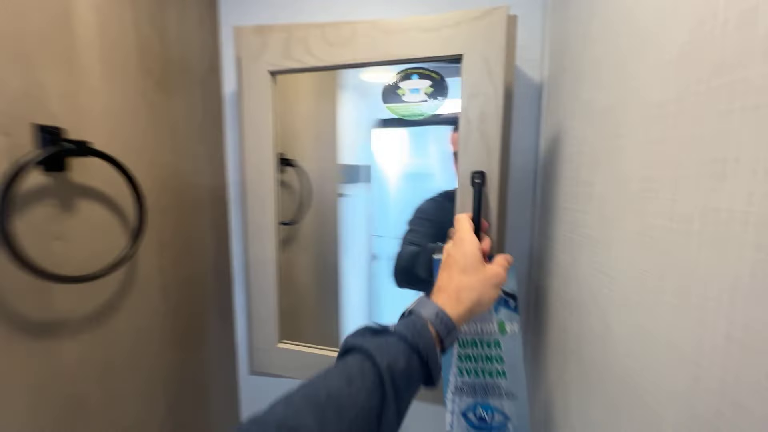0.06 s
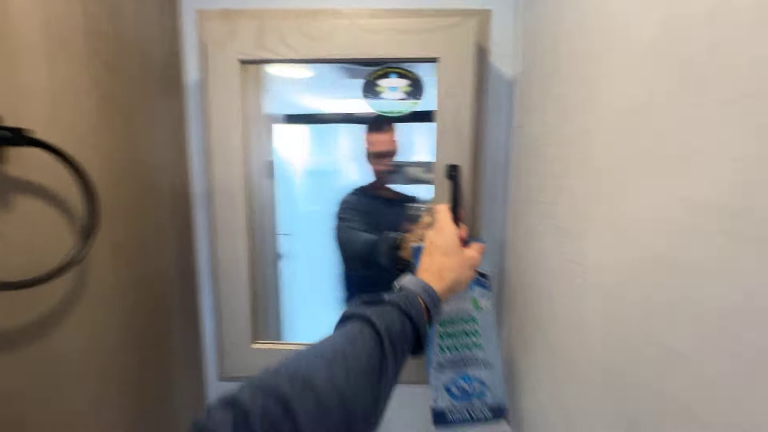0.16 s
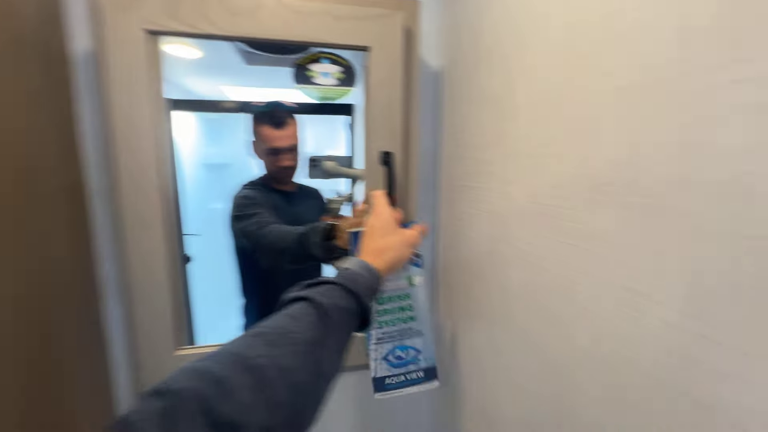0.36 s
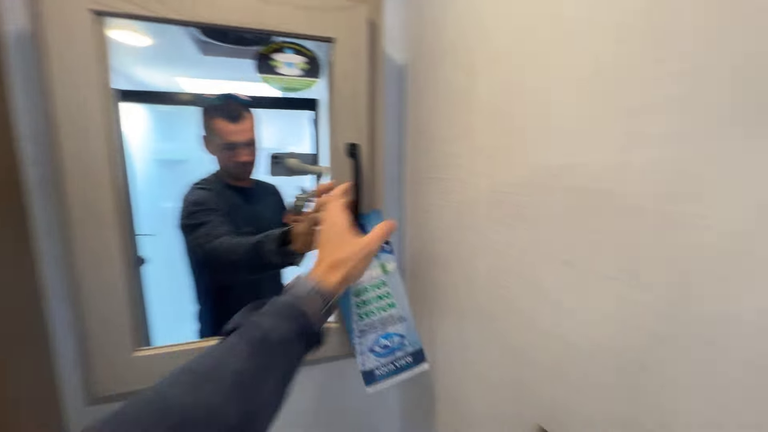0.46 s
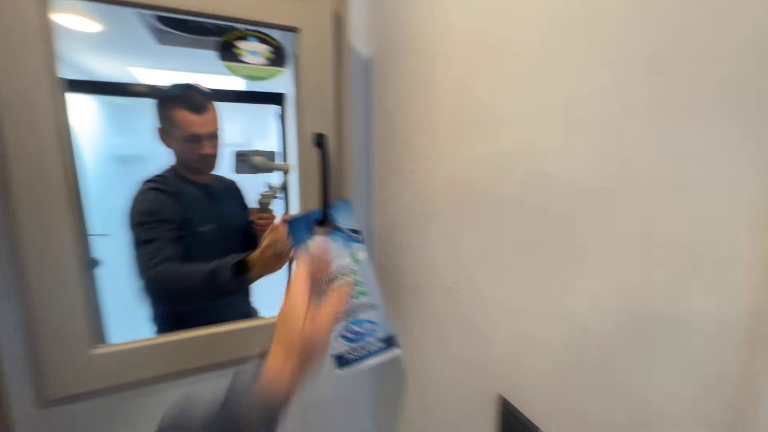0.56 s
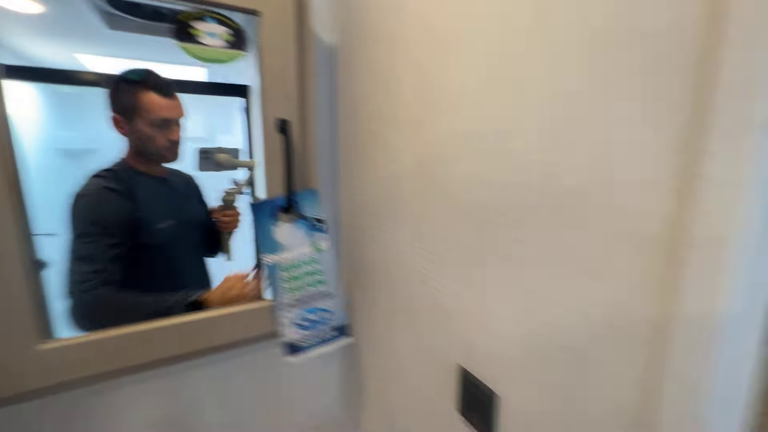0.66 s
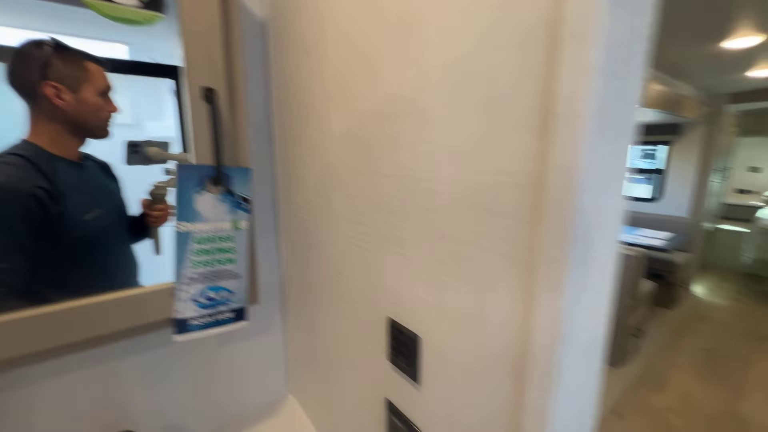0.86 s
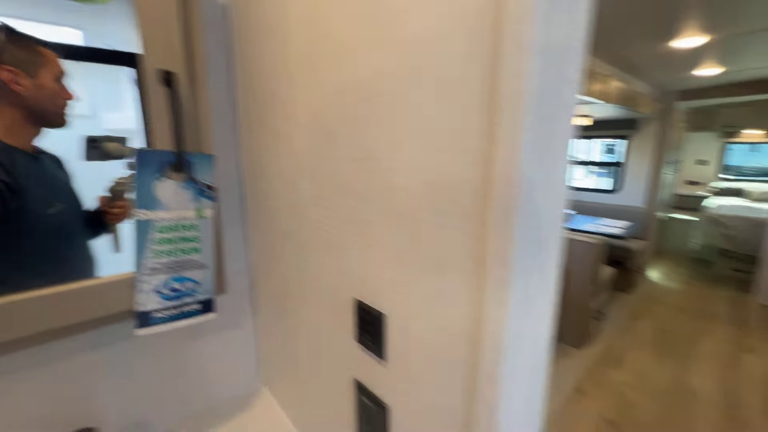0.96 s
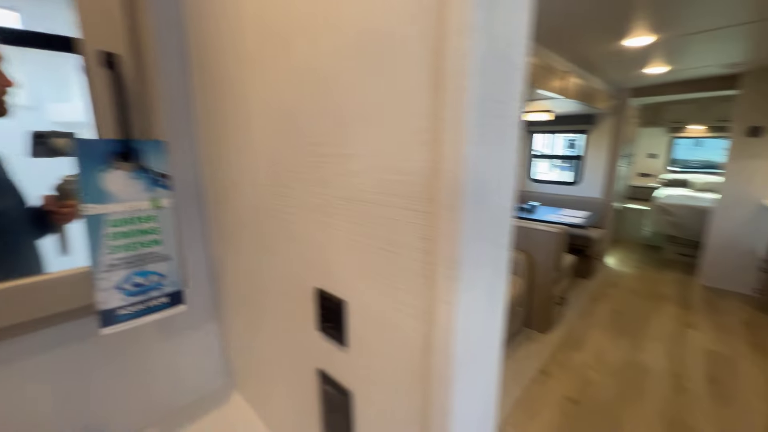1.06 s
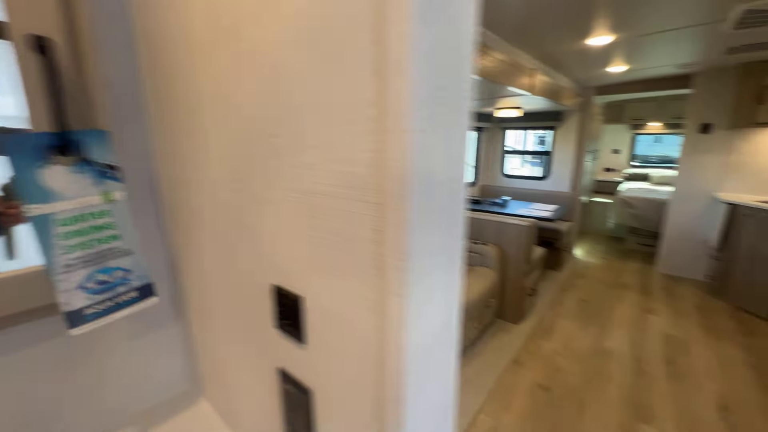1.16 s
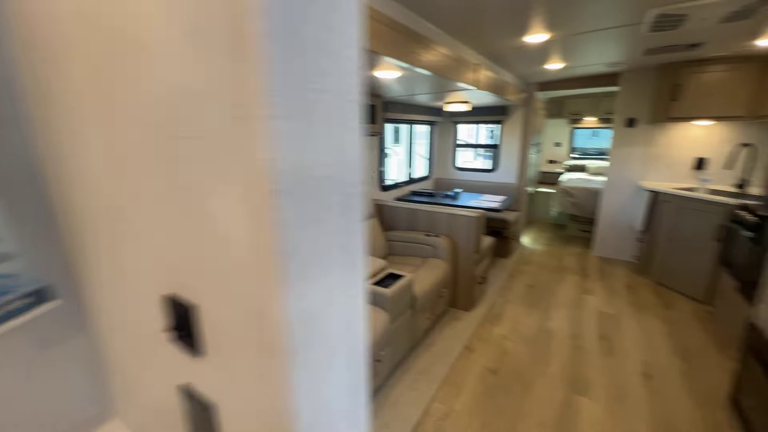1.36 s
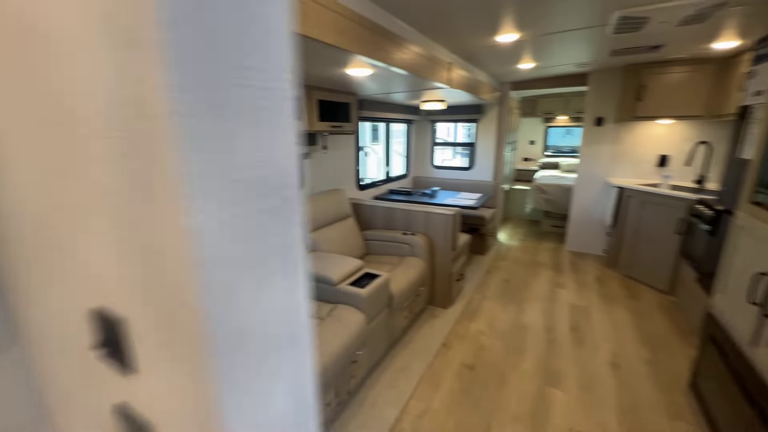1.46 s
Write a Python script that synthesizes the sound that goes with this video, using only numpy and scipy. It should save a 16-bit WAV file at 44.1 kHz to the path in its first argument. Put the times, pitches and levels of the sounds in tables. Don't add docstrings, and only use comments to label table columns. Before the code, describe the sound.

A light wooden cabinet door with a mirror slaps shut close to the microphone in a small trailer washroom; sharp crack and catch clack, brief glassy rattle, hollow wall boom, then soft card swishes and small taps.

```python
import sys
import numpy as np
from scipy import signal
from scipy.fft import rfft, irfft
from scipy.io import wavfile
from scipy.ndimage import uniform_filter1d

SR = 44100
rng = np.random.default_rng(int(sys.argv[2]) if len(sys.argv) > 2 else 0)


def wrap_up_sound(samples):
    columns = np.atleast_2d(samples).T
    tamed = np.clip(columns, -1, 1)
    steps = np.round(tamed * 32767).astype(np.int16)
    wavfile.write(sys.argv[1], SR, steps)


def gain_from_db(level_db):
    decades = np.asarray(level_db, float) / 20
    return 10 ** decades


N = 66150
T = np.arange(N) / SR
HZ = np.maximum(np.fft.rfftfreq(N, 1 / SR), 1)

# freq_hz, density_db_per_hz
HUM_COLOUR = [(70, -30.5), (120, -17.5), (200, -21.5), (520, -7.5), (840, -28), (2000, -39), (3900, -55),
              (16000, -58)]
# freq_hz, width_hz, level_db
HUM_RESONANCES = [(390, 29, -1.5), (562, 57, -1), (254, 50, -8), (1560, 300, -16), (2420, 250, -17)]
# time_s, level_db
RUMBLE_LEVEL = [(0, -39), (.1, -37.5), (.2, -42.5), (.5, -33.5), (.72, -50.5), (.9, -47.5), (1.099, -53.5),
                (1.5, -56.5)]
# centre_s, level_db, pitch_hz, half_length_s
BUMPS = [(0.029, -33, 179, 0.0046), (0.038, -25.5, 76, 0.01), (0.076, -32, 55.7, .018),
         (0.099, -32.5, 55.23, .01), (0.183, -32, 68.7, .012), (0.434, -26, 66, 0.027),
         (0.481, -20.5, 69, 0.017), (0.556, -26.5, 63, 0.027), (0.611, -33, 60, 0.016),
         (0.675, -27.5, 66, 0.027), (0.825, -35, 48.7, 0.012), (1.197, -46.5, 102, 0.017)]
# time_s, level_db
MOTION_LEVEL = [(0, -87), (.08, -77.5), (.116, -69), (.18, -85), (.3, -58), (.37, -62), (.44, -59),
                (.5, -63), (.568, -69), (.66, -63.5), (.72, -67), (0.801, -77.5), (.803, -53), (.86, -59.5),
                (.922, -68), (1.05, -76.5), (1.22, -99), (1.5, -105)]
# freq_hz, density_db_per_hz
SLEEVE_COLOUR = [(500, -32.5), (900, -19.5), (1700, -12), (2450, -3), (4500, -7.5), (7000, -7.5),
                 (12000, -11), (16000, -18.5)]
# start_s, level_db, pitch_hz, brightness_db, overtones_db
TAPS = [(.090, -60, 2800, -6, -8), (.098, -57, 2300, -10, -10), (.107, -58, 2900, -10, -10),
        (.121, -56, 2900, -10, -10), (.13, -60, 2500, -10, -10), (.490, -50, 3380, -12, -12),
        (.581, -48.5, 2206, -17.5, -3.5), (0.8026, -41, 2590, -1, -19.5), (0.8102, -40, 2430, 3.5, -13),
        (.8145, -45.5, 2424, 2, -15), (.826, -53, 2500, -6, -15), (.830, -35, 2398, -0.5, 2),
        (.834, -44, 2780, -5, -2), (.839, -41, 2610, -7, 0), (.844, -40, 2590, -15.5, -14.5),
        (.8545, -43, 2430, -12, 3), (.859, -45.5, 2460, -5.5, 0), (.865, -48, 2380, -7, -1),
        (.879, -51, 2360, -19, 1), (.89, -54, 2350, -15, -8), (1.298, -62, 2330, -20, -6),
        (1.305, -63, 2400, -22, -8), (1.424, -61, 2006, -5, -3), (0.944, -62.5, 3100, 1, -5)]
# pitch_ratio, level_db
TAP_MODES = [(.95, -1.5), (1.06, -3)]
# pitch_ratio, level_db
TAP_OVERTONES = [(0.521, -5), (1.46, -3.5), (1.88, -8)]
# freq_hz, density_db_per_hz
TAP_COLOUR = [(500, -20.5), (1500, -15), (2400, -8.5), (4000, -7), (6600, -9), (11000, -7), (16000, -16.5)]
# freq_hz, level_db
THIN_TONES = [(7740, -47), (5530, -55.5)]
# start_s, level_db, chatter_t60_s
CONTACTS = [
    (.2110, -10.5, .01),
    (.2124, -8.5, .012),
    (.2145, -9.5, .012),
    (.2168, -11, .012),
    (.2195, -18.5, .016),
    (.2240, -24.5, .03),
]
# freq_hz, density_db_per_hz
CRACK_COLOUR = [(300, -28.5), (1300, -19), (2360, -12.5), (3830, -16.5), (7200, -15), (10000, -13.5),
                (12500, -19), (16000, -26.5)]
# freq_hz, level_db, t60_s
CATCH_MODES = [(2414, -7, .04), (2365, -14.5, .05), (1402.6, -17, .035), (1633, -15, .035),
               (2122, -15.5, .03), (2593, -17, .03), (2983, -19, .025), (3352, -19, 0.036),
               (1056, -20, 0.025), (860, -21.5, .03), (640, -20, .04), (490, -18, .06)]
# freq_hz, level_db, t60_s
MIRROR_MODES = [(1405, -20, 0.2), (1486, -22, 0.18), (1605, -25.5, 0.25), (1782, -21, .16),
                (2180, -22, 0.16), (2190, -23, .24), (2288, -25.5, 0.25), (2357, -15, 0.17),
                (3328, -25, 0.2), (4460, -23, 0.03), (5098, -22, 0.027), (6730, -16.5, 0.06),
                (7220, -22, 0.04), (8100, -26, 0.03)]
# freq_hz, density_db_per_hz
TAIL_COLOUR = [(300, -7.5), (715, -24), (1630, -30), (2300, -29.5), (3620, -33), (6580, -29.5),
               (11500, -36), (16000, -52)]
# freq_hz, level_db, t60_s
WALL_OUT = [(42.3, -34, 1.5), (52.3, -10, .29), (68.1, -15.5, 1.1), (73.9, -6, .56), (85.6, -11, .4),
            (95, -16.5, .66), (116.4, -25, .57)]
# freq_hz, level_db, t60_s
WALL_IN = [(54.4, -20.5, .9), (62.6, -5, .56), (136.7, 6.5, .06), (162, -15.5, .21)]
# freq_hz, level_db, t60_s
PANEL_MODES = [(565, -26, 0.24), (637, -22, 0.2), (745, -29.5, 0.37), (813, -27.5, .22), (861, -15, 0.17),
               (931, -23, .26), (1075, -17, .22), (1200, -28, .2)]
# freq_hz, level_db, t60_s
FRAME_OUT = [(217.3, -12, .29), (286.8, -17, .24), (354.1, -15.5, .19),
             (385, -26, .26), (260, -23.5, .15), (325, -26.5, .15), (420, -28.5, 0.12)]
# freq_hz, level_db, t60_s
FRAME_IN = [(227.5, -25, .8), (448.6, -23, .22)]
# centre_s, level_db, half_length_s
SWISHES = [
    (.385, -56, .04),
    (.445, -53, .035),
    (.68, -70, .05),
]
# freq_hz, density_db_per_hz
SWISH_COLOUR = [(1500, -35), (3200, -12), (4500, -4), (6600, -2), (8500, -6), (12000, -11), (14500, -10),
                (16000, -20)]
# freq_hz, side_db
SIDE_SHARE = [(60, -19.5), (380, -12), (700, -3), (1300, -3), (2200, -17), (4500, -18.5), (6000, -41),
              (16000, -40.5)]
# freq_hz, phase_rad
PORT_PHASE = [(0, 0), (690, .3), (2000, 0), (2900, 0), (3700, .5), (5100, 0), (7200, 0), (8600, -1.4),
              (9150, -3.1), (10800, -3.18), (11300, -4.3), (13400, -6.28), (14100, -6.6), (15500, -8.2),
              (16200, -9.8)]
# freq_hz, level_db
PORT_BALANCE = [(60, 1.9), (330, 1.7), (520, -2.5), (1000, .4), (2400, 0)]


def on_log(table):
    rows = np.array(table, float)
    return np.interp(np.log(HZ), np.log(np.maximum(rows[:, 0], 1)), rows[:, 1])


def level_over_time(table):
    rows = np.array(table, float)
    return np.interp(T, rows[:, 0], rows[:, 1])


def unit(x):
    return x / np.sqrt(np.mean(x ** 2))


def noise(gain):
    mid, side = rfft(rng.standard_normal((2, N))) * gain
    pair = mid + np.array([[1], [-1]]) * side * gain_from_db(on_log(SIDE_SHARE))
    return unit(irfft(pair, N))


def fade(start_s, t60_s, rise_s=.0003):
    out, first = np.zeros(N), int(np.ceil(start_s * SR))
    age_s = T[first:first + int(2 * t60_s * SR)] - start_s
    rise = 1 - np.exp(-age_s / rise_s)
    out[first:first + len(age_s)] = rise * np.exp(-np.log(1000) * age_s / t60_s)
    return out


def ring(modes, start_s, push_s):
    out, first = np.zeros(N), int(start_s * SR)
    for hz, db, t60_s in modes:
        span = slice(first, first + int(2 * t60_s * SR))
        age_s = np.maximum(T[span] - start_s - push_s / 2, 0)
        out[span] += gain_from_db(db) * np.sin(2 * np.pi * hz * age_s) * fade(start_s, t60_s, push_s)[span]
    return out


def walk(rate_hz):
    k = int(SR / rate_hz)
    steps = np.repeat(rng.standard_normal(N // k + 1), k)
    smooth = uniform_filter1d(uniform_filter1d(steps, k), k)
    return unit(smooth[:N])


def band(hz, width_hz):
    return 1 / np.sqrt(1 + ((HZ - hz ** 2 / HZ) / width_hz) ** 2)


def bell(centre_s, half_s):
    return np.exp(-((T - centre_s) / half_s) ** 2)


def trailer_hum():
    steady = noise(gain_from_db(on_log(HUM_COLOUR)) * band(600, 4034) ** 0.12)
    boxy_gain = sum(gain_from_db(db) * band(hz, width_hz) for hz, width_hz, db in HUM_RESONANCES)
    throb = gain_from_db(2.4 * walk(45))
    return gain_from_db(-55) * (steady + gain_from_db(-2.5) * noise(boxy_gain ** 2) * throb)


def hand_rumble():
    return noise(band(60, 58) ** 2) * gain_from_db(level_over_time(RUMBLE_LEVEL))


def sleeve_rustle():
    grain_db = 1.5 * walk(160)
    return gain_from_db(level_over_time(MOTION_LEVEL) + grain_db) * noise(gain_from_db(on_log(SLEEVE_COLOUR)))


def bumps():
    return -sum(gain_from_db(db) * np.cos(2 * np.pi * hz * (T - s)) * bell(s, half_s)
                for s, db, hz, half_s in BUMPS)


def card_taps():
    edge_t60_s, wash_t60_s, wash_db = 0.0093, .08, -14.5
    hiss, wash = noise(gain_from_db(on_log(TAP_COLOUR))), noise(gain_from_db(on_log(TAP_COLOUR)))
    out = 0
    for s, db, hz, bright_db, overtones_db in TAPS:
        ratios = TAP_MODES + [(ratio, g + overtones_db) for ratio, g in TAP_OVERTONES]
        modes = [(hz * ratio, g, edge_t60_s * 1.62) for ratio, g in ratios]
        edge = hiss * fade(s, edge_t60_s) + gain_from_db(wash_db) * wash * fade(s, wash_t60_s)
        out = out + gain_from_db(db) * (ring(modes, s, 0.00033) + gain_from_db(bright_db) * edge)
    return out


def thin_tones():
    start_s, rise_s = .191, .008
    swell = np.clip((T - start_s) / rise_s, 0, 1) * (T < CONTACTS[0][0])
    return swell * sum(gain_from_db(db + 2.5 * walk(200)) * np.sin(2 * np.pi * hz * T) for hz, db in THIN_TONES)


def contact_crack():
    colour = gain_from_db(on_log(CRACK_COLOUR))
    crack = noise(colour) * sum(gain_from_db(db) * fade(s, t60_s) for s, db, t60_s in CONTACTS)
    side = noise(colour)[0] * np.array([[1], [-1]])
    return crack + gain_from_db(-17) * side * fade(CONTACTS[0][0], 0.016, 0.00057)


def mirror_and_catch():
    mirror_s = .2135
    mirror = gain_from_db(-8.5) * ring(MIRROR_MODES, mirror_s, .0006)
    catch_first = gain_from_db(-6) * ring(CATCH_MODES[2:], .2117, .0006)
    catch = ring(CATCH_MODES, .2145, .0012) + catch_first
    rattle = gain_from_db(1.2 * walk(120))
    shimmer_gain = band(2380, 200) ** 2 + gain_from_db(-4.5) * band(6600, 500) ** 2
    shimmer = gain_from_db(-34) * noise(shimmer_gain) * fade(mirror_s, .35, .004)
    return (mirror + catch) * rattle + shimmer


def room_tail():
    return gain_from_db(-18.5 + 0.5 * walk(90)) * noise(gain_from_db(on_log(TAIL_COLOUR))) * fade(.2135, 0.36, 0.002)


def hollow_wall():
    start_s, push_s = .2153, .01
    modes = ring(WALL_OUT, start_s, push_s) - ring(WALL_IN, start_s, push_s)
    boom_gain = band(150, 70) ** 2 + gain_from_db(3) * band(28, 39) ** 2
    boom = noise(boom_gain) * fade(start_s, 0.54, 0.023)
    return gain_from_db(0.54) * modes + gain_from_db(-22) * boom


def door_panel():
    return gain_from_db(-12) * ring(PANEL_MODES, .2165, 0.0016)


def door_frame():
    start_s, push_s = .2172, .005
    modes = ring(FRAME_OUT, start_s, push_s) - ring(FRAME_IN, start_s, push_s)
    return gain_from_db(0.54) * modes


def card_swishes():
    air = noise(gain_from_db(on_log(SWISH_COLOUR)))
    dull = irfft(rfft(air) * band(6000, 5000) ** 2, N)
    (first_s, first_db, first_half_s), *rest = SWISHES
    first = gain_from_db(first_db) * bell(first_s, first_half_s) * dull
    return first + air * sum(gain_from_db(db) * bell(s, half_s) for s, db, half_s in rest)


def scene():
    background = trailer_hum() + hand_rumble()
    handling = sleeve_rustle() + bumps() + card_taps()
    strike = thin_tones() + contact_crack() + mirror_and_catch()
    body = room_tail() + hollow_wall() + door_panel() + door_frame()
    return background + handling + strike + body + card_swishes()


def roll_off(x):
    return signal.sosfilt(signal.butter(12, 16510, fs=SR, output="sos"), x)


def record(dry):
    limit, top_hz = 1.8, 16300
    rows = np.array(PORT_PHASE, float)
    phase_rad = np.interp(HZ, rows[:, 0], rows[:, 1])
    half = np.exp(.5j * phase_rad) * gain_from_db(on_log(PORT_BALANCE) / 2)
    low_cut = HZ ** 2 / (HZ ** 2 + 12 ** 2)
    ports = irfft(rfft(dry) * np.array([half, 1 / half]) * low_cut, N)
    rounded = limit * np.tanh(ports / limit)
    mix = irfft(rfft(rounded) * (HZ < top_hz), N)
    return roll_off(mix)


dry = scene()
out = record(dry)
wrap_up_sound(out)
```